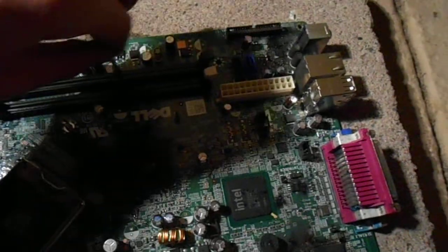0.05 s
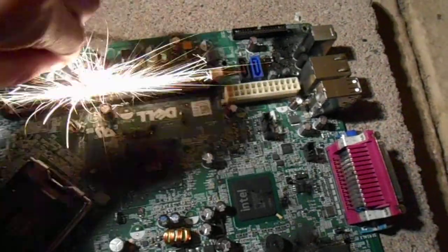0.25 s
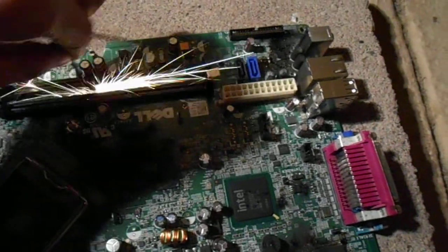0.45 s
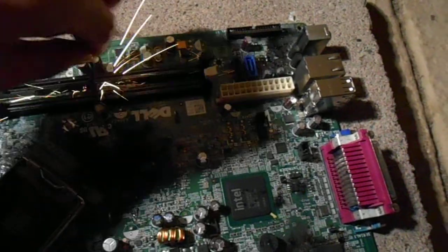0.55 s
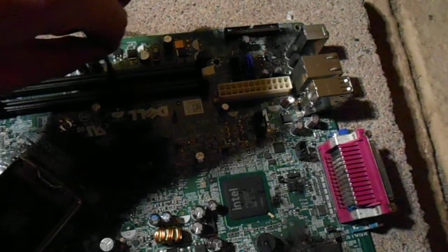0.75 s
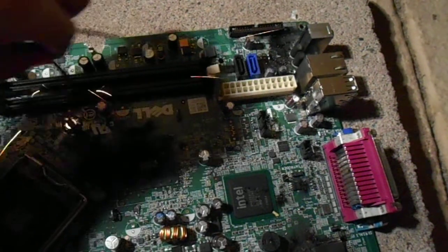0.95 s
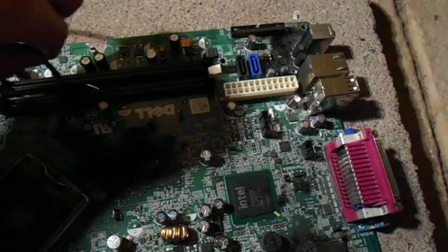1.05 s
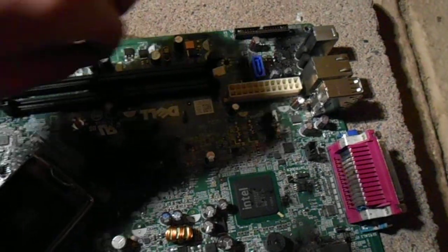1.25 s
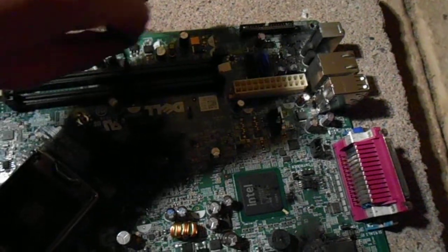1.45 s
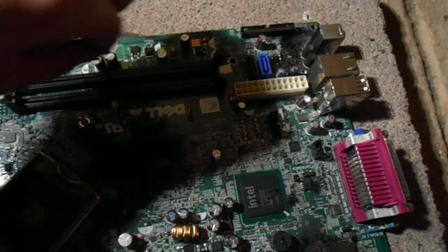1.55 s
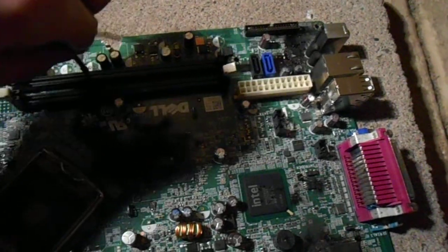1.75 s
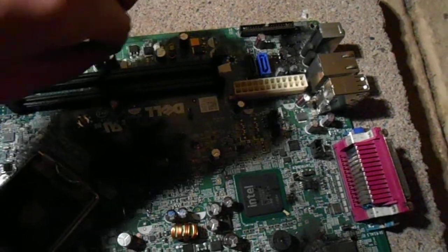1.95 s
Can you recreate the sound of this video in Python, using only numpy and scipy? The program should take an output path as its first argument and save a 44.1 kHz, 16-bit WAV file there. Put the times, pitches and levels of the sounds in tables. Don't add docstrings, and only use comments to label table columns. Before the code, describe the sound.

Electric sparks crackle on a circuit board, close and dry in a small room. Faint taps lead to a violent, distorted burst with a low thump at 0.23-0.31 seconds. Separate snaps follow at 0.49-0.64, then a dense clattering cluster at 0.92-0.99. A rising and falling scrape carries sharp snaps around 1.33; knocks, scraping and crackles at 1.6-1.73 fade into quiet hum and hiss.

```python
import sys
import numpy as np
from scipy import signal
from scipy.io import wavfile
from scipy.ndimage import uniform_filter1d

SR = 44100
rng = np.random.default_rng(int(sys.argv[2]) if len(sys.argv) > 2 else 0)


def master(y):
    cut = np.clip(np.atleast_2d(y).T, -1, 1)
    pcm = np.round(cut * 32767)
    wavfile.write(sys.argv[1], SR, pcm.astype(np.int16))


def invert_db(level):
    return 10 ** (np.asarray(level, dtype=float) / 20)


N = 88200

# start_s, level_db, burn_ms, board_knock_db
SPARK_EVENTS = [(.2314, -14.5, 3, -19), (.2612, -22, 8.5, -29), (.2702, -15, 7, -28),
                (.2775, -10.5, 14, -20), (.2955, -11, 6, -23), (.3035, -13, 5.5, -20),
                (.3108, -20, 1.5, -33), (.4918, -13, 3.5, -28), (.5342, -19, 1, -32),
                (.5362, -15, 2.5, -28), (.5725, -11, 4, -26), (.5785, -12, 3.5, -26), (.633, -29, 4, -28),
                (.6394, -10, 3, -26), (.9063, -34, 4, -35), (.9225, -23, 4.5, -29), (.9348, -8, 3, -22),
                (.9395, -11, 4, -25), (.952, -23, 2, -35), (.955, -10.5, 5.5, -25), (.969, -17, 1.5, -29),
                (.9722, -20, 2.5, -30), (.976, -21, 4, -29), (.987, -12, 3, -21)]


def evened(x):
    return x / np.sqrt(np.mean(x ** 2) + 1e-20)


def curve(points):
    return invert_db(np.interp(np.arange(N) / SR, *np.transpose(points)))


def colour(x, points):
    f, db = np.transpose(points)
    hz = abs(np.fft.fftfreq(4096, 1 / SR))
    log_gain = np.log(invert_db(np.interp(np.log(hz + 1), np.log(f + 1), db, right=-90)))
    response = np.exp(np.conj(signal.hilbert(log_gain)))
    impulse = np.fft.ifft(response).real[:2048]
    return signal.oaconvolve(x, impulse / np.linalg.norm(impulse))[:N]


def resonate(x, hz, width):
    r = np.exp(-np.pi * width / SR)
    angle = 2 * np.pi * hz / SR
    gain = np.sqrt(2 - 2 * r * r) * np.sin(angle)
    return signal.lfilter([gain], [1, -2 * r * np.cos(angle), r * r], x)


def body(x, modes):
    return sum((-1) ** k * invert_db(db) * resonate(x, hz, width) for k, (hz, width, db) in enumerate(modes))


def clicks(per_s, spread_db):
    u = rng.random((3, N))
    size = invert_db(-spread_db * np.log(u[0] + 1 / 25))
    return evened(size * np.sign(u[1] - .5) * (u[2] < per_s / SR))


def burns(rows):
    rise_ms, die_ms, droop_db = .3, 2.0, 4
    ms = np.arange(N) / SR * 1000
    total = np.zeros(N)
    for start_s, level_db, burn_ms in rows:
        age = ms - 1000 * start_s
        rise = np.clip(age / rise_ms, 0, 1)
        death = np.exp(-np.maximum(age - burn_ms, 0) / die_ms)
        droop = invert_db(droop_db * (.5 - np.clip(age / burn_ms, 0, 1)))
        total += invert_db(level_db) * rise * death * droop
    return total


def room_floor():
    # time_s, level_db
    load_curve = [(0, -4), (.16, 5), (.3, -2), (.7, -4.5), (.79, -8.5), (.93, 9), (1.1, -5), (1.2, 3.5),
                  (1.33, 2.5), (1.45, -2), (1.62, 7), (1.8, -2), (2, 0)]
    # frequency_hz, level_db
    hiss_spectrum = [(12, -10.5), (20, 4.5), (251, -10.5), (716, -9.5), (842, -11.5), (1600, -18),
                     (1790, -23.5), (8060, -24), (12400, -33.5), (16100, -71.5), (22000, -120)]
    # frequency_hz, width_hz, level_db
    hum_modes = [(141, 50, -55), (56, 233, -51.5)]
    # time_s, level_db
    tone_curve = [(0, -49.5), (.15, -47), (.25, -62), (.7, -58.5), (.85, -57.5), (.95, -52.5),
                  (1.08, -60.5), (1.2, -46), (1.35, -50.5), (1.5, -59), (1.65, -48.5), (1.8, -55.5),
                  (2, -64.5)]
    tone_hz, waver_hz = 146, 3
    load = curve(load_curve)
    hiss = invert_db(-50.5) * evened(colour(rng.standard_normal(N), hiss_spectrum))
    hum = sum(invert_db(db) * evened(resonate(rng.standard_normal(N), hz, width)) for hz, width, db in hum_modes)
    hz = tone_hz + waver_hz * evened(uniform_filter1d(rng.standard_normal(N), 4000))
    tone = np.sqrt(2) * curve(tone_curve) * np.sin(2 * np.pi * np.cumsum(hz) / SR)
    return load * (hiss + hum) + tone


def surge():
    # time_s, level_db
    current_breaks = [
        (.2705, -9),
        (.2726, -7),
        (.2752, -4),
        (.2769, -5),
        (.2783, -6),
    ]
    # start_s, level_db
    air_puffs = [
        (.4935, -29),
        (.537, -33),
        (.575, -28),
        (.641, -30),
        (.958, -19),
        (1.3435, -13),
    ]
    start_s, length_ms, break_ms, puff_ms = .2707, 6.8, .09, 0.46
    t = np.arange(N) / SR
    after = np.maximum(t - start_s - length_ms / 1000, 0)
    jolt = -invert_db(-1) * (t > start_s) * np.exp(-after / 0.00089)
    jolt = jolt + sum(invert_db(db) * np.exp(-(1000 * (t - s) / break_ms) ** 2) for s, db in current_breaks)
    swing = invert_db(-4) * np.exp(-1000 * after / 57.3)
    sag = invert_db(-18) * np.exp(-1000 * after / 193)
    rebound = (1 - np.exp(-after / 0.0023)) * (swing - sag)
    crackle = uniform_filter1d(burns([row[:3] for row in SPARK_EVENTS]), 40)
    rebound = rebound * np.exp(-2.4 * crackle)
    puffs = np.zeros(N)
    for s, db in air_puffs:
        age = np.maximum(t - s, 0) * 1000 / puff_ms
        puffs += invert_db(db) * age * (2 - age) * np.exp(-age)
    return uniform_filter1d(jolt, 6) + rebound + puffs


def taps():
    # start_s, peak_db, ring_hz, overtones_db
    knocks = [(0.024, -33.5, 990, -4), (0.028, -33, 1116, -17), (0.059, -47.5, 1170, -17),
              (0.114, -43, 1190, 5), (0.134, -34, 1060, -5), (0.175, -39.5, 1065, -2.5),
              (0.196, -30, 990, -16), (0.205, -34.5, 1080, -8), (0.214, -27, 1080, -1.5),
              (0.671, -44, 1090, -1), (0.685, -39.5, 1060, 3), (0.769, -42.5, 1090, -19),
              (0.805, -47.5, 1150, -17), (0.829, -46, 1060, -13), (0.878, -41.5, 1030, 7),
              (0.895, -27.5, 1020, -16), (0.907, -29, 1060, -18), (0.92, -20.5, 1077, -10),
              (0.938, -17.5, 1107, -7), (0.987, -16, 1042, -5), (1.201, -37.5, 1090, -5.5),
              (1.222, -33.5, 1170, -0.5), (1.237, -35, 1060, 4), (1.546, -35, 1086, -16),
              (1.588, -30, 1044, -12), (1.611, -25, 1058, -5), (1.627, -25.5, 1060, -16.5),
              (1.647, -14, 1060, -11), (1.663, -21, 1104, -13), (1.692, -24, 948, -3),
              (1.931, -42.5, 1170, -10), (1.976, -38, 1108, -10.5)]
    # frequency_hz, t60_s, level_db
    overtones = [(1762, 0.039, -1.5), (3000, 0.033, -5), (3870, 0.0131, -11)]
    t60_s, rise_ms = .04, .6
    t = np.arange(3000) / SR
    out = np.zeros(N + 3000)
    detunings = rng.uniform(0.87, 1.05, (len(knocks), 3))
    for (start_s, peak_db, ring_hz, over_db), detuning in zip(knocks, detunings):
        ring = invert_db(-60 * t / t60_s) * np.sin(2 * np.pi * ring_hz * t)
        for (hz, over_t60_s, db), ratio in zip(overtones, detuning):
            decay = invert_db(over_db + db - 60 * t / over_t60_s)
            ring += decay * np.sin(2 * np.pi * hz * ratio * t)
        out[round(start_s * SR):][:3000] += invert_db(peak_db) * ring * np.minimum(1000 * t / rise_ms, 1)
    return out[:N]


def slide():
    # time_s, pitch_hz, level_db
    path = [
        (1.2, 1740, -63),
        (1.26, 2300, -39.5),
        (1.318, 3000, -32),
        (1.332, 3400, -19.5),
        (1.361, 2530, -31.5),
        (1.384, 2100, -29),
        (1.42, 1800, -54),
    ]
    width_hz = 800
    t = np.arange(N) / SR
    s, hz, db = np.transpose(path)
    turn = np.exp(2j * np.pi * np.cumsum(np.interp(t, s, hz)) / SR)
    r = np.exp(-np.pi * width_hz / SR)
    ring = (turn * signal.lfilter([1 - r], [1, -r], clicks(2800, 1.7) / turn)).real
    return evened(ring) * invert_db(np.interp(t, s, db, -120, -120))


def scrape():
    # time_s, level_db
    drag_curve = [(0, -51), (.03, -70), (.07, -63.5), (.235, -25.5), (.33, -69), (.62, -94), (.645, -41.5),
                  (.74, -68), (.86, -60), (.91, -32.5), (.995, -32), (1.015, -53), (1.5, -63.5),
                  (1.65, -24.5), (1.74, -39), (1.8, -78), (1.92, -57), (1.98, -45.5)]
    # frequency_hz, width_hz, level_db
    board_modes = [(139, 68, -30.5), (841, 88, -8.5), (1060, 130, -6.5), (1705, 110, -9), (3090, 410, -9.5),
                   (3840, 200, -17)]
    # time_s, level_db
    rasp_curve = [(.64, -52), (.67, -44), (.735, -41.5), (.75, -89), (1.15, -74), (1.24, -40), (1.27, -23),
                  (1.33, -21), (1.385, -43), (1.41, -48), (1.46, -57)]
    # frequency_hz, width_hz, level_db
    pin_modes = [(918, 180, -11.5), (1705, 230, -15), (2390, 79, -12.5), (3000, 100, -14),
                 (3400, 590, -15.5), (3750, 180, -16)]
    lumps = invert_db(2.2 * evened(uniform_filter1d(rng.standard_normal((2, N)), 300, axis=1)))
    drag = body(clicks(970, 3) * lumps[0] * curve(drag_curve), board_modes)
    rasp = body(clicks(2500, 3.5) * lumps[1] * curve(rasp_curve), pin_modes)
    return drag + rasp


def fizz():
    # time_s, level_db
    fizz_curve = [(0, -43.5), (.07, -61.5), (.14, -37.5), (.25, -37), (.31, -27), (.4, -44), (.5, -53),
                  (.7, -45), (.76, -66), (.86, -57), (.96, -23.5), (1.1, -53), (1.22, -58), (1.36, -29.5),
                  (1.5, -57.5), (1.63, -27), (1.76, -63), (1.9, -72)]
    # frequency_hz, level_db
    fizz_spectrum = [(120, -19.5), (200, -14.5), (796, -9), (1030, -38.5), (1380, -15), (3580, -7),
                     (9740, 1), (12400, -24.5), (16100, -24), (22000, -120)]
    flicker = invert_db(1.8 * evened(uniform_filter1d(rng.standard_normal(N), 200)))
    return colour(clicks(12000, 6.4) * flicker * curve(fizz_curve), fizz_spectrum)


def sparks():
    # start_s, level_db, burn_ms, board_knock_db
    late_sparks = [(1.2655, -37, 4, -35), (1.3125, -28, 4, -28), (1.3278, -11, 2.5, -22),
                   (1.333, -15, 3.5, -22), (1.3423, -7, 5.5, -25), (1.3565, -19, 2, -28),
                   (1.361, -24, 3, -28), (1.5963, -35, 6, -34), (1.6282, -24, 8, -35), (1.643, -19, 2, -25),
                   (1.6477, -18, 2, -25), (1.656, -25, 3, -29), (1.662, -14, 3, -24),
                   (1.6786, -13, 3.5, -25), (1.693, -32, 5, -34), (1.7095, -25, 2, -27),
                   (1.722, -25, 2, -29), (1.7252, -11, 3.5, -20.5), (1.381, -32, 5, -30),
                   (1.9945, -44, 4, -52), (1.7405, -33, 3, -34)]
    # start_s, crackle_db, board_knock_db
    ticks = [(0.024, -52, -63), (0.1166, -63.5, -49), (0.133, -45, -33), (0.169, -33, -42),
             (0.4638, -42, -45.5), (.828, -51, -48.5), (0.8768, -41.5, -42), (0.896, -60, -36),
             (1.222, -57, -53), (1.238, -47, -47), (1.248, -37.5, -44), (1.5339, -55, -51),
             (1.5524, -61, -44), (1.566, -54, -40.5), (1.9438, -50.5, -44), (1.9767, -47.5, -45)]
    # frequency_hz, level_db
    spark_spectrum = [(120, -63.5), (200, -18), (522, -15.5), (4150, -9.5), (5360, -4), (7820, -0.5),
                      (8670, 3), (9770, 6), (12000, -11), (15600, -64), (22000, -120)]
    # frequency_hz, width_hz, level_db
    knock_modes = [(410, 1740, -11), (830, 430, -9.5), (1050, 158, -6.5), (1880, 830, -5),
                   (3000, 1420, -1.5), (5800, 5700, -4.5)]
    tick_burn_ms = 4
    rows = SPARK_EVENTS + late_sparks + [(s, db, tick_burn_ms, knock_db) for s, db, knock_db in ticks]
    crack_envelope = burns([row[:3] for row in rows])
    knock_envelope = burns([(s, knock_db, burn_ms) for s, _, burn_ms, knock_db in rows])
    arc = colour(clicks(11000, 0) * crack_envelope, spark_spectrum)
    knock = body(clicks(6000, 5.7) * knock_envelope, knock_modes)
    return arc + knock


def room(x):
    # delay_ms, level_db
    echoes = [
        (15.3, -19),
        (20.5, -25),
    ]
    t60_s = 0.31
    t = np.arange(SR // 2) / SR
    sparse = rng.choice([-1., 1.], len(t)) * (rng.random(len(t)) < .05)
    tail = sparse * invert_db(-60 * t / t60_s) * (t > .004)
    impulse = invert_db(-17) * tail / np.linalg.norm(tail)
    for delay_ms, db in echoes:
        impulse[round(delay_ms * SR / 1000)] += invert_db(db)
    reflected = colour(x, [(1500, -4.0), (7000, -7.5), (22000, 4.0)])
    return signal.fftconvolve(reflected, impulse)[:N]


def scene():
    background = room_floor() + surge()
    near = taps() + slide() + scrape() + fizz() + sparks()
    return (near + room(near) + background)[None]


def low_pass(x):
    return signal.sosfilt(signal.butter(12, 16790, fs=SR, output="sos"), x)


def record(dry):
    clip, shelf_hz, edge_hz, top_hz = invert_db(-3.1), 10700, 12400, 15900

    def below(v, hz):
        kernel = signal.firwin(255, hz, window=("kaiser", 8), fs=SR)
        return signal.oaconvolve(v, kernel[None], "same")

    x = below(dry, shelf_hz)
    x = x + invert_db(-8) * (dry - x)
    for _ in range(3):
        x = np.clip(x, -clip, clip)
        low = below(x, edge_hz)
        x = low + invert_db(-8) * (x - low)
    return low_pass(below(x, top_hz))


dry = scene()
out = record(dry)
master(out)
```